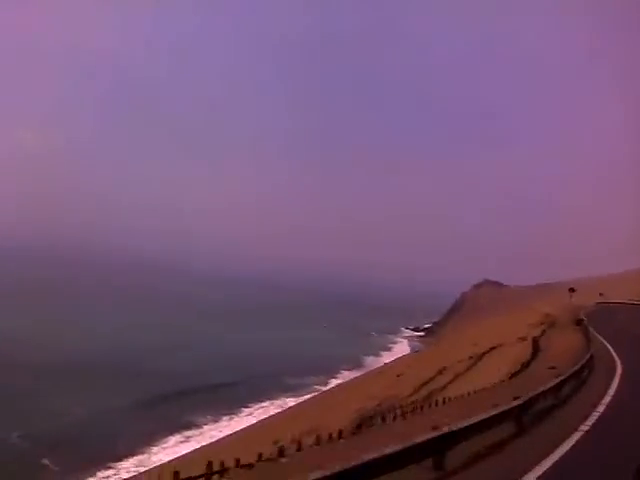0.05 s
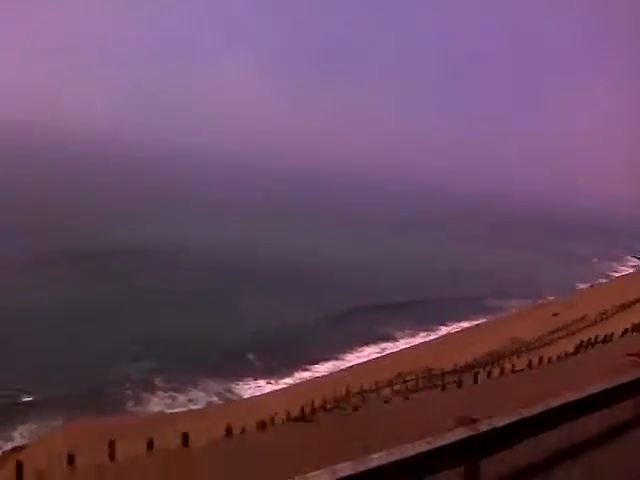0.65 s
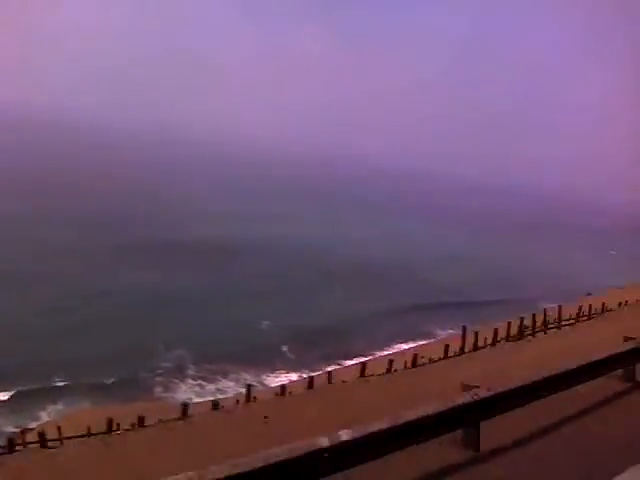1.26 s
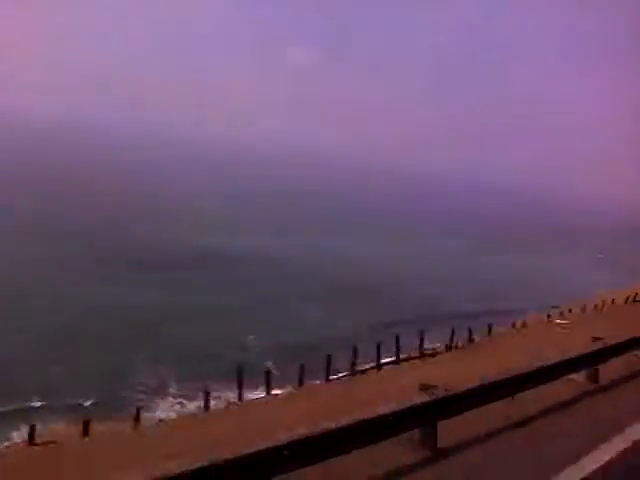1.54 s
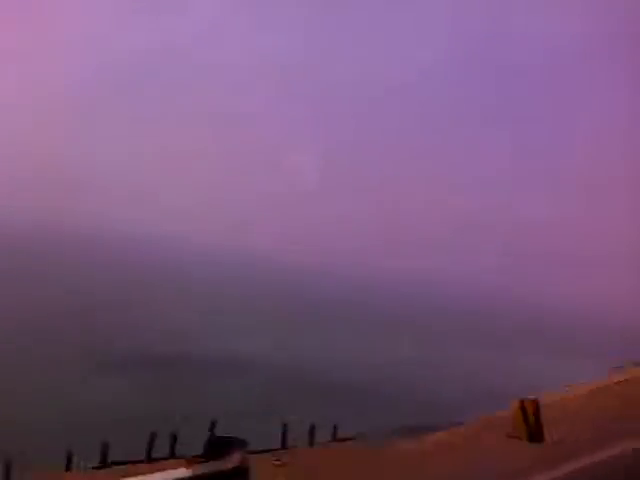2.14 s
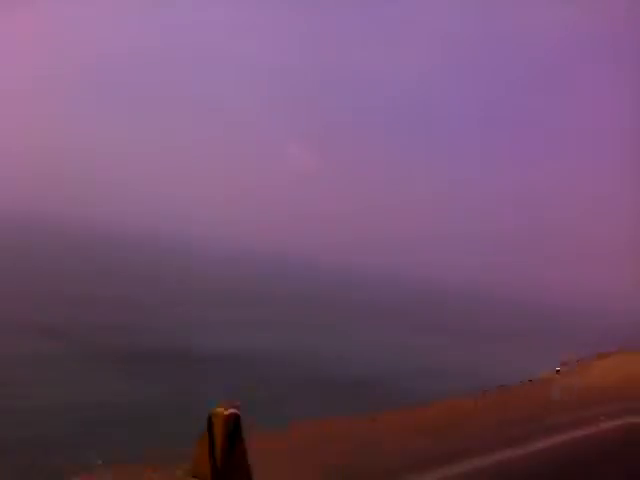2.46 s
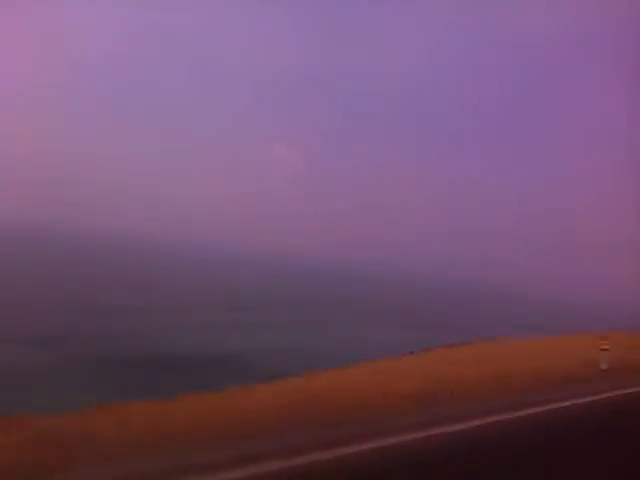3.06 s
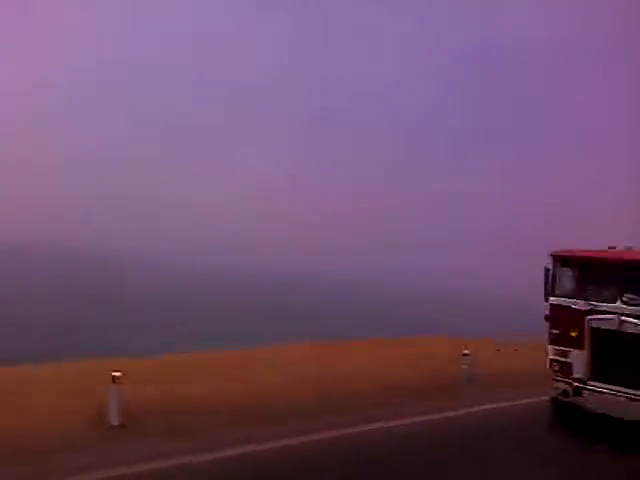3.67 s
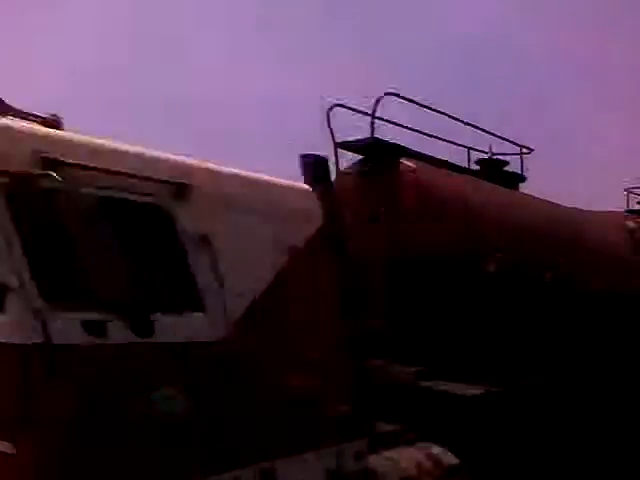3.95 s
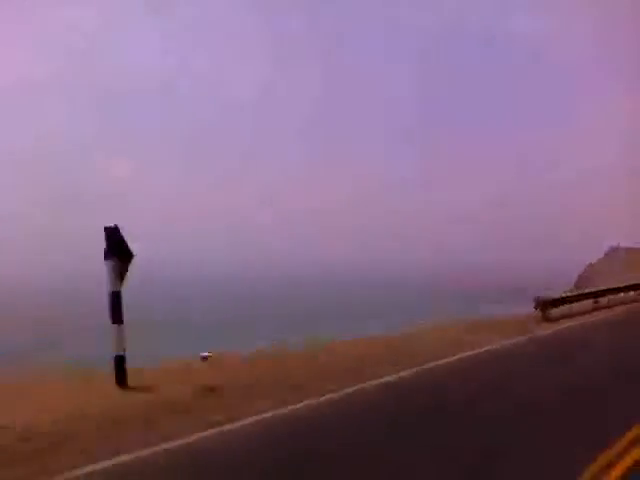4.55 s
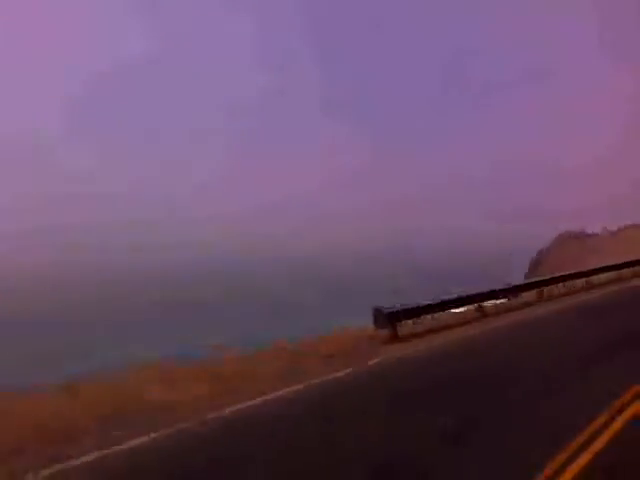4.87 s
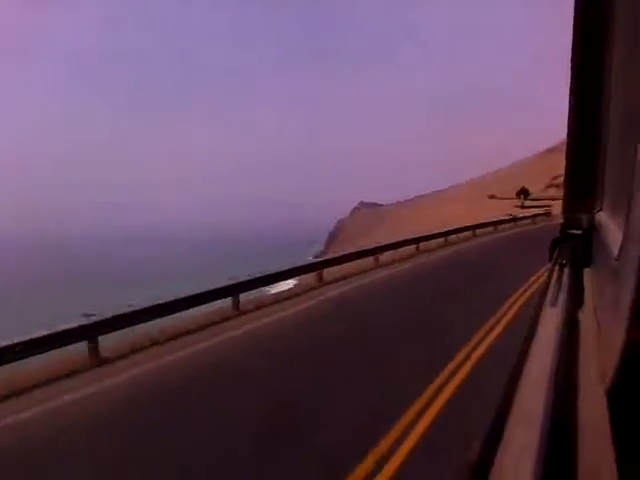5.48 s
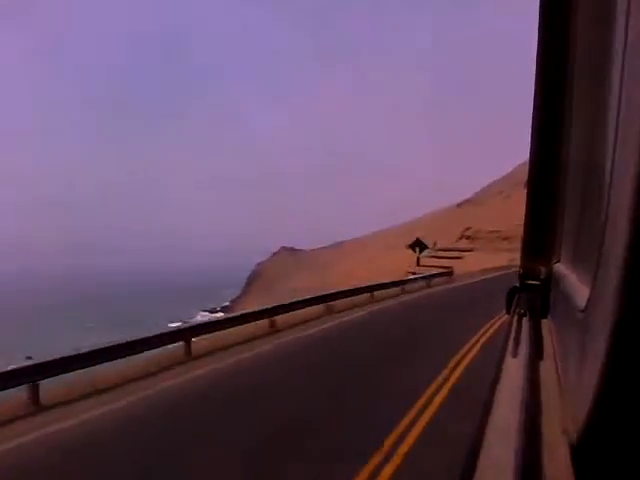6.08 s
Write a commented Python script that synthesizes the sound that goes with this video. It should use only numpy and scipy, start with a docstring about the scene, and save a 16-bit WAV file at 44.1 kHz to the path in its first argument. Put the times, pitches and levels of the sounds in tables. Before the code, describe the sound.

Gusty wind buffets the microphone at an open bus window over tyre roar and engine hum, as a tanker truck rushes past.

```python
"""Wind buffets a phone microphone held at the open window of a bus on a coastal highway.
Gusts thump, flutter and slap right on the port and overload the input into a harsh crackle.
Underneath are tyre roar, engine hum and slipstream hiss; the guardrail and roadside objects throw
the tyre noise back. About four seconds in, an oncoming tanker truck sweeps past at close range
with a rush of air and a brief, sinking drone."""
import sys
import numpy as np
from scipy import signal
from scipy.fft import rfft, irfft, next_fast_len
from scipy.io import wavfile
from scipy.ndimage import uniform_filter1d

SR = 44100
rng = np.random.default_rng(int(sys.argv[2]) if len(sys.argv) > 2 else 0)


def pcm_store(signal):
    """Save signal as 16-bit PCM."""
    levels = np.round(np.clip(np.atleast_2d(signal), -1, 1) * 32767)
    wavfile.write(sys.argv[1], SR, levels.astype(np.int16).T)


N = 278401

# spectrum of the hiss along the window frame, also heard in the swishes: f/Hz, relative level/dB
HISS_SPECTRUM = [(2000, -22), (3200, -6), (4100, -4.5), (5200, 2.5), (6300, 4.5), (7100, 6), (8000, 4),
                 (9200, -8.5), (11000, -21), (13000, -42), (16000, -39)]
# tight vortices on the microphone port: t/s, relative level/dB, starting swing rate f/Hz
VORTICES = [(.076, 5.5, 1310), (.168, 6, 630), (.376, 7, 1060), (.799, 5, 496), (1.128, 1, 545),
            (1.199, 3, 840), (1.222, 8, 806), (1.346, 0.5, 506), (1.509, 9, 1770), (1.569, 6.5, 940),
            (1.738, -0.5, 536), (1.952, -7, 500), (4.538, 4, 1100), (4.581, 10, 1200), (4.635, -1, 1030),
            (4.654, 10, 950), (4.698, 5, 780), (4.837, 1, 800), (4.894, 4.5, 547), (5.107, 0, 563),
            (5.151, 2.5, 527), (5.206, 18, 1190), (5.249, 12, 1380), (5.291, 11, 980), (5.307, 6, 1380),
            (5.323, 11, 1210), (5.396, 12, 1340), (5.442, 6, 1740), (5.476, 4.5, 1460), (5.606, 1, 1110),
            (5.640, 9.5, 1410), (5.768, 15, 1100), (5.793, 5, 1500), (5.916, 4, 1470), (6.169, 7.5, 720),
            (6.233, 1, 643)]


def from_db(db):
    """Decibels to gain."""
    return 10 ** (np.asarray(db) / 20)


def in_time(rows):
    """Each column after t/s, joined by straight lines at every sample."""
    times, *columns = np.transpose(rows)
    return [np.interp(np.arange(N) / SR, times, column) for column in columns]


def shaped_noise(gain_at):
    """White noise weighted by a gain that depends on frequency; rms 1."""
    size = next_fast_len(N, True)
    hz = np.maximum(np.arange(size // 2 + 1) * SR / size, 1)
    noise = irfft(rfft(rng.standard_normal(size)) * gain_at(hz), size)[:N]
    return noise / np.sqrt(np.mean(noise ** 2) + 1e-20)


def coloured(spectrum):
    """Noise shaped by rows of f/Hz, relative level/dB; rms 1."""
    points_hz, level_db = np.transpose(spectrum)
    return shaped_noise(lambda hz: from_db(np.interp(np.log(hz), np.log(points_hz), level_db)))


def drift(rate):
    """A smooth random curve that changes about rate times a second; rms 1."""
    return shaped_noise(lambda hz: 1 / (1 + (hz / rate) ** 2) ** 2)


def evened(x, size=2000):
    """Keep the fast lumps of a noise but hold its slow level at 1."""
    return x / np.sqrt(uniform_filter1d(uniform_filter1d(x * x, size), size) + 1e-9)


def rough_tone(hz, width_hz):
    """A narrow band of noise around a pitch that may glide; rms about 1."""
    phase = 2 * np.pi * np.cumsum(hz * np.ones(N)) / SR
    return evened(drift(width_hz) * np.cos(phase) + drift(width_hz) * np.sin(phase))


def air_push(start, length, attack_s=0.014, release_s=0.022):
    """Envelope of a push of air: it rises quickly, holds and dies away."""
    age = np.arange(N) / SR - start
    return np.clip(age / attack_s, 0, 1) * np.exp(-np.maximum(age - length, 0) / release_s)


def swells(rows):
    """Gain of things that come and go smoothly, from rows of t/s, level/dB, half length/s."""
    t = np.arange(N) / SR
    return sum(from_db(level_db) / (1 + ((t - peak) / half) ** 4) for peak, level_db, half in rows)


def gusting(lull_large_db=-18.5, lull_small_db=-27):
    """Strength of the large and of the small eddies: gusts add their power to the steady buffeting."""
    # gusts on the port: start t/s, length/s, large-eddy level/dB, small-eddy level/dB
    gusts = [(-0.02, .15, -2.5, -5), (0.147, 0.26, -13.5, -14.5), (0.555, 0.092, -16, -33),
             (.605, 0.021, -5.5, -19), (.72, 0.03, -14, -23), (0.792, 0.016, -8.5, -11.5),
             (0.885, 0.15, -10.5, -15), (1.062, 0.19, -6.5, -11.5), (1.279, 0.15, -14, -21),
             (1.49, 0.088, -10.5, -13), (1.611, 0.21, -13, -21), (1.851, .14, -11.5, -24),
             (2.06, 0.14, -19, -24.5), (2.273, 0.1, -15.5, -31), (2.47, 0.032, -22, -29),
             (2.584, .17, -15, -26.5), (2.752, 0.11, -12, -22), (2.926, 0.044, -13, -34),
             (3.149, 0.086, -11.5, -29), (3.275, 0.068, -12, -34), (3.425, 0.33, -14, -23),
             (3.74, 0.25, -9.5, -14.5), (4.219, 0.19, -11.5, -19), (4.499, 0.22, -9, -12.5),
             (4.77, 0.089, -11, -15.5), (4.9, .21, -9.5, -13.5), (5.197, 0.22, -12.5, -4),
             (5.447, 0.15, -11, -9), (5.505, 0.16, -11, -7.5), (5.756, 0.097, -5, -1),
             (5.855, 0.12, -14, -8.5), (6.058, .06, -9.5, -11), (6.16, 0.019, -13, -11.5),
             (6.214, 0.077, -7.5, -11)]
    large_power, small_power = from_db(lull_large_db) ** 2, from_db(lull_small_db) ** 2
    for start, length, large_db, small_db in gusts:
        push = air_push(start, length)
        large_power += (push * from_db(large_db)) ** 2
        small_power += (push * from_db(small_db)) ** 2
    return np.sqrt(large_power), np.sqrt(small_power)


def wind(large_gain_db=0.5, small_gain_db=-0.1, large_lump_db=2.5, small_lump_db=5.0, lumps_per_s=50):
    """Right on the microphone, large eddies thump and small ones flutter in the same short packets."""
    # spectra of the large and of the small eddies: f/Hz, relative level/dB
    large_eddies = [(15, -6), (30, -54), (48, -29), (80, -7.5), (130, -1.5), (200, -0.5), (310, -2.5),
                    (430, -9.5), (700, -28.5), (1500, -86), (4000, -67.5)]
    small_eddies = [(120, -19), (260, 0.5), (400, 4.5), (580, 3.5), (900, -5), (1400, -12.5), (2300, -21),
                    (3500, -34), (7000, -34.5), (16000, -56.5)]
    large_push, small_push = gusting()
    packets = drift(lumps_per_s)
    thump = evened(coloured(large_eddies) * from_db(large_lump_db * packets))
    flutter = evened(coloured(small_eddies) * from_db(small_lump_db * packets))
    flutter += crackle(20 * np.log10(small_push))
    buffet = thump * large_push * from_db(large_gain_db) + flutter * small_push * from_db(small_gain_db)
    return stalls() * buffet


def eddy_front(rise_ms, length_ms=0.55, size=440):
    """An eddy core crosses the port: pressure builds, flips steeply and relaxes."""
    age_ms = np.arange(-size, size + 1) * 1000 / SR
    return np.tanh(age_ms / rise_ms) * np.exp(-np.abs(age_ms) / length_ms)


def crackle(gust_db, height_db=3.0, spread_db=3.0, fronts_per_s=280):
    """Fronts scattered thickly among the small eddies; they steepen and tear in the hardest gusts."""
    heights = from_db(height_db + spread_db * rng.standard_normal(N)) * np.sign(rng.standard_normal(N))
    arrivals = heights * (rng.random(N) < fronts_per_s / SR)
    steep_share = np.interp(gust_db, [-15, -3], [0, 1])
    gentle = signal.fftconvolve(arrivals * (1 - steep_share), eddy_front(rise_ms=.22), "same")
    steep = signal.fftconvolve(arrivals * steep_share, eddy_front(rise_ms=.08), "same")
    return gentle + steep


def window_boom(width_hz=18):
    """The air in the opening around the microphone resonates as long as a push of air drives it."""
    # pushes on the opening: start t/s, length/s, level/dB, resonance f/Hz
    booms = [(-0.02, 0.135, -4, 335), (4.11, 0.063, -10.5, 317), (4.3, 0.11, -11, 304.6)]
    return sum(rough_tone(hz, width_hz) * from_db(level_db) * air_push(start, length)
               for start, length, level_db, hz in booms)


def bus_ride(flicker_db=1.5, flickers_per_s=33):
    """The bus from its own window: tyres roar, the engine hums, air hisses unevenly along the frame."""
    # course of the ride: t/s, tyre level/dB, slipstream level/dB
    ride_levels = [(0, -20.5, -36), (.7, -21, -36.5), (1.1, -22, -39), (1.85, -20.5, -37),
                   (2.5, -23, -40.5), (3.6, -21, -40), (4.15, -20.5, -37), (5.1, -20.5, -37),
                   (5.55, -26, -47), (5.8, -16, -32.5), (6.03, -20.5, -49), (6.31, -18, -44)]
    # spectrum of the tyres on the road: f/Hz, relative level/dB
    tyre_spectrum = [(25, -25), (70, 19), (120, 1.5), (220, 19), (400, 9), (700, 6), (1000, 6.5),
                     (1600, 1.5), (2400, 0), (3100, -10), (4000, -23.5), (7000, -20), (16000, -80)]
    # engine hum under the wind: f/Hz, width/Hz, level/dB
    engine_bands = [(75.5, 7.2, -34.5), (166.3, 5.7, -29), (212.6, 54, -29.5)]
    tyre_db, hiss_db = in_time(ride_levels)
    tyres = coloured(tyre_spectrum) * from_db(tyre_db)
    hiss = coloured(HISS_SPECTRUM) * from_db(hiss_db + flicker_db * drift(flickers_per_s))
    engine = sum(from_db(level_db) * rough_tone(hz, width) for hz, width, level_db in engine_bands)
    return tyres + hiss + engine


def roadside(swish_roar_db=2.5):
    """Tyre noise comes back steadily from the near guardrail and in swishes from single objects."""
    # reflection off the guardrail: t/s, level/dB
    rail_levels = [(0, -35), (.3, -28.5), (.75, -22.5), (1.0, -30.5), (1.4, -35), (2.2, -55), (2.6, -80)]
    # spectrum of the reflected roar: f/Hz, relative level/dB
    echo_spectrum = [(300, -6), (900, 10.5), (1400, 1), (2100, 4), (3000, -24), (4000, -34), (7000, -10),
                     (9500, -28), (11100, -27), (12500, -35), (16000, -49)]
    # objects passing the window: t/s, level/dB, half length/s
    swishes = [(1.284, -36, .03), (1.40, -37, .017), (1.922, -35, 0.038), (2.14, -34, 0.018),
               (2.354, -35.5, 0.039), (2.784, -35, 0.057)]
    rail_db, = in_time(rail_levels)
    nearness = swells(swishes)
    roar = coloured(echo_spectrum) * (from_db(rail_db) + from_db(swish_roar_db) * nearness)
    return roar + coloured(HISS_SPECTRUM) * nearness


def stalls(depth=0.27, size=620):
    """The flow over the port hesitates for an instant before each slap."""
    flow = np.ones(N)
    for slap_s, _, _ in VORTICES:
        end = round(slap_s * SR)
        flow[end - size:end] *= 1 - depth * signal.windows.tukey(size)
    return flow


def slaps(gain_db=-4.0, decay_cycles=2.55, wobble=0.4, size=1300):
    """Tight vortices hit the port: each gives a few uneven pressure swings that slow as they die."""
    pressure, age = np.zeros(N), np.arange(size) / SR
    unevenness = np.exp(wobble * drift(940))
    for start, level_db, hz in VORTICES:
        span = slice(round(start * SR), round(start * SR) + size)
        fade = np.exp(-age * hz / decay_cycles)
        phase = 2 * np.pi * np.cumsum(hz * unevenness[span] * (1 + fade) / 2) / SR
        polarity = np.sign(rng.standard_normal())
        pressure[span] += from_db(level_db + gain_db) * fade * np.sin(phase) * polarity
    return pressure


def tick(start_s=1.5093, level_db=-10.0, hz=4200, width_hz=500, decay_s=0.00065):
    """One dry snap as a hard slap of wind overloads the microphone."""
    age = np.arange(N) / SR - start_s
    return from_db(level_db) * rough_tone(hz, width_hz) * (age >= 0) * np.exp(-np.abs(age) / decay_s)


def truck(cab_passes_s=3.94, tail_passes_s=4.45, closing_m_per_s=40, side_distance_m=1.6):
    """A tanker passes close by: a low shove of air, a rush, and a drone that sinks as the cab goes by."""
    # spectrum of the truck's rush: f/Hz, relative level/dB
    rush_spectrum = [(50, -21), (200, -43), (330, 15.5), (520, 2), (800, 2), (1150, 4), (1600, -1.5),
                     (2300, -3.5), (3100, -17), (4000, -30), (5500, -21.5), (7000, -12), (9000, -26.5),
                     (12000, -38), (16000, -42)]
    # deep buffeting ahead of the truck and in its wake: t/s, level/dB, half length/s
    bow_and_wake = [(3.56, -15.5, 0.26), (3.89, -9.5, 0.032), (4.64, -13, 0.13), (5.02, -17.5, 0.045)]
    rush_db, rush_falloff = -12.5, .8
    drone_db, drone_hz, doppler_shift, drone_distance_m = -14, 251.7, .04, 3.5
    t = np.arange(N) / SR
    cab_m, tail_m = closing_m_per_s * (t - cab_passes_s), closing_m_per_s * (t - tail_passes_s)
    # the rush grows with the share of the microphone's view that the truck fills
    view = np.abs(np.arctan(cab_m / side_distance_m) - np.arctan(tail_m / side_distance_m)) / np.pi
    rush = coloured(rush_spectrum) * from_db(rush_db) * view ** rush_falloff
    range_m = np.hypot(cab_m, drone_distance_m)
    heard_hz = drone_hz * (1 - doppler_shift * cab_m / range_m)
    drone = rough_tone(heard_hz, width_hz=5) * from_db(drone_db) * drone_distance_m / range_m
    shove = rough_tone(hz=155, width_hz=55) * swells(bow_and_wake)
    return rush + drone + shove


def edge_hiss(start_s=6.02, rise_s=0.092, level_db=-38.5, hz=5300, width_hz=1500):
    """A band of hiss from air shed off the window edge beside the microphone."""
    fade_in = np.clip((np.arange(N) / SR - start_s) / rise_s, 0, 1)
    return rough_tone(hz, width_hz) * from_db(level_db) * fade_in


def scene():
    """Everything meets at one microphone: air on the port, then the window, the bus and the highway."""
    on_port = wind() + slaps() + tick()
    at_window = window_boom() + edge_hiss()
    return (on_port + at_window + bus_ride() + roadside() + truck())[None, :]


def record(dry, overload=.71, hardness=18, soften_hz=11000, cutoff_hz=15850):
    """The phone's input flattens strong gusts into near square waves, rounds them and cuts the top."""
    clipped = dry / (1 + np.abs(dry / overload) ** hardness) ** (1 / hardness)
    pole = np.exp(-2 * np.pi * soften_hz / SR)
    rounded = signal.lfilter([1 - pole], [1, -pole], clipped)
    return signal.fftconvolve(rounded, signal.firwin(401, cutoff_hz, fs=SR)[None, :], "same")


dry = scene()
out = record(dry)
pcm_store(out)
```